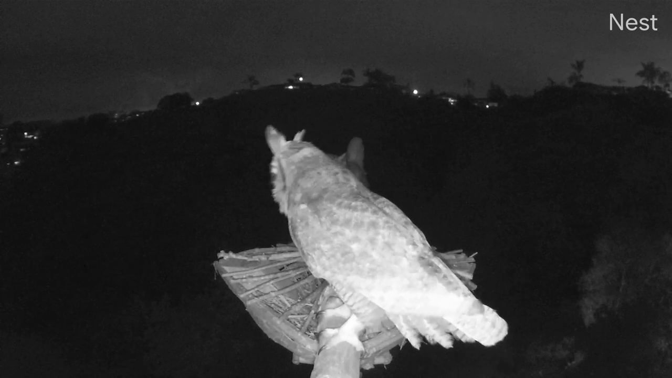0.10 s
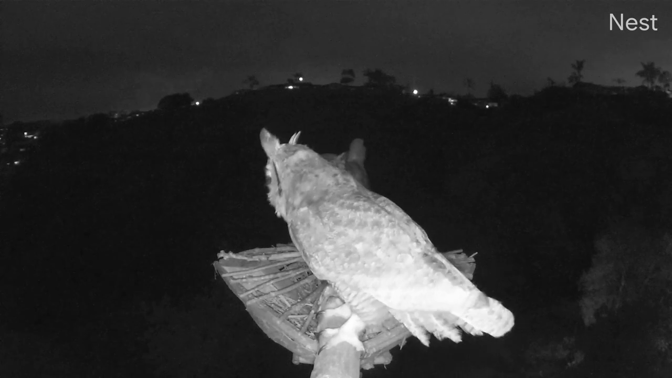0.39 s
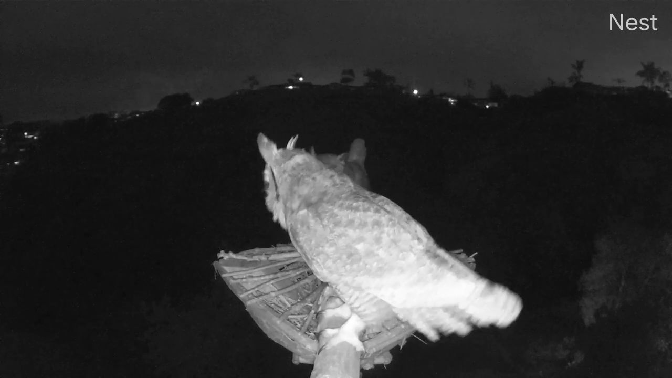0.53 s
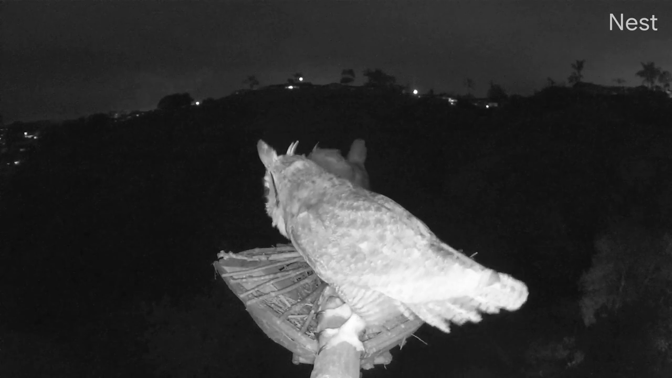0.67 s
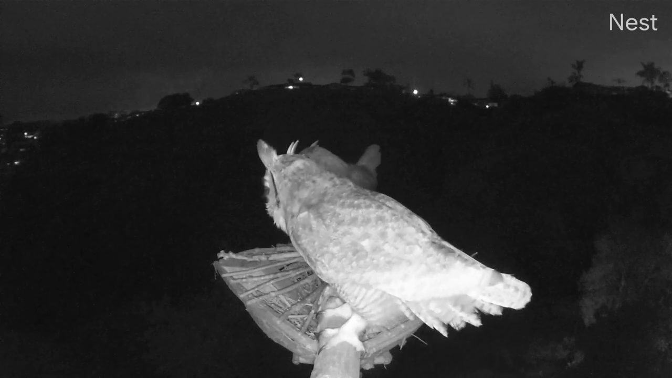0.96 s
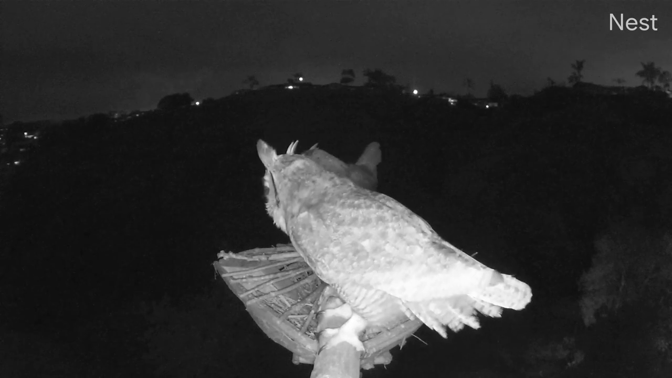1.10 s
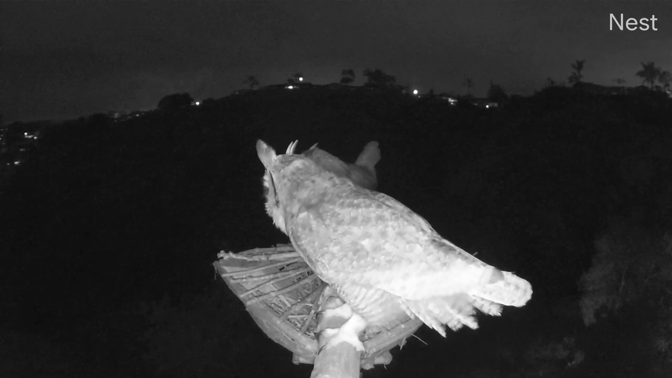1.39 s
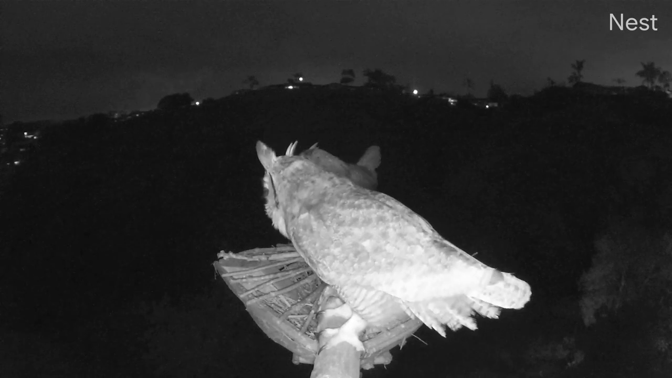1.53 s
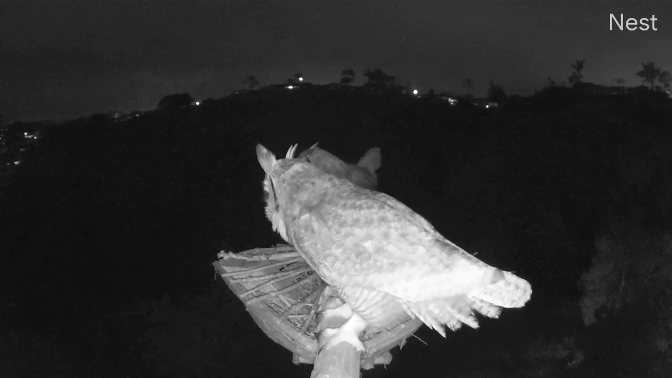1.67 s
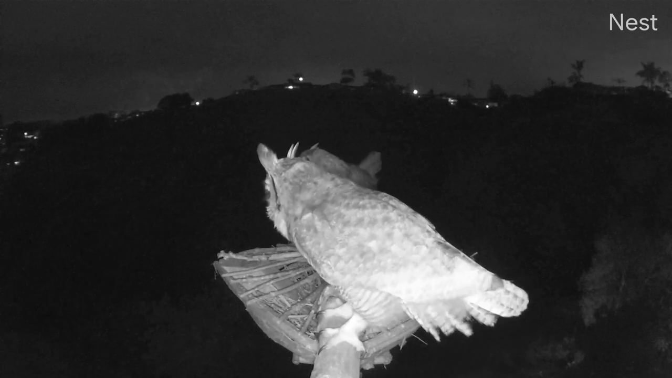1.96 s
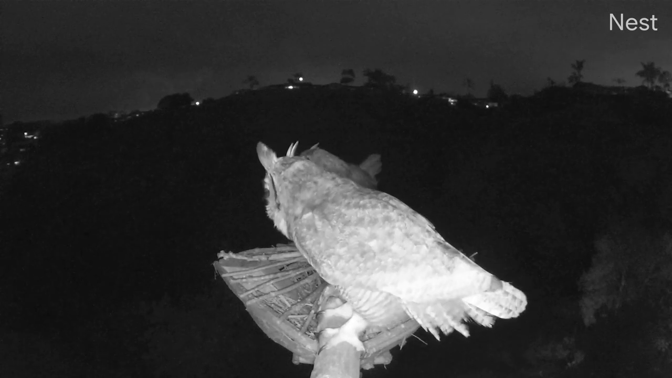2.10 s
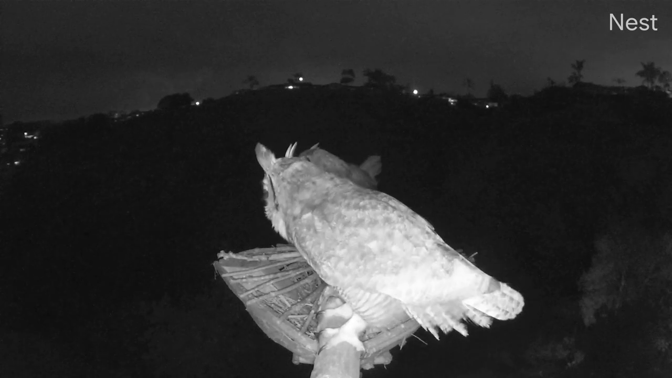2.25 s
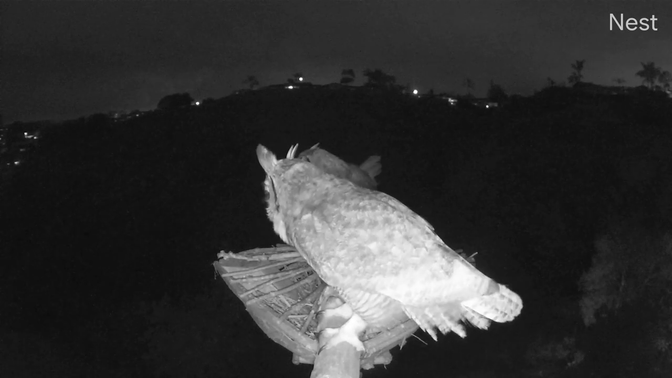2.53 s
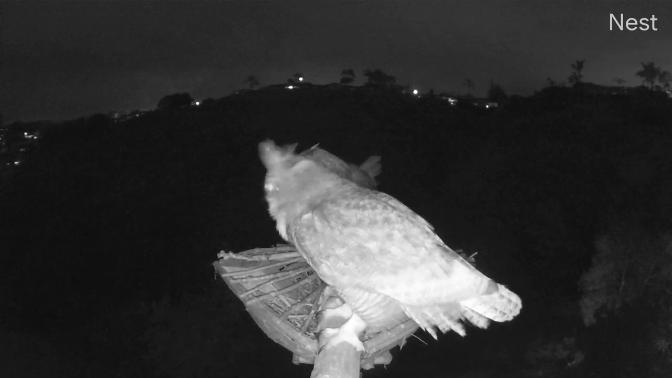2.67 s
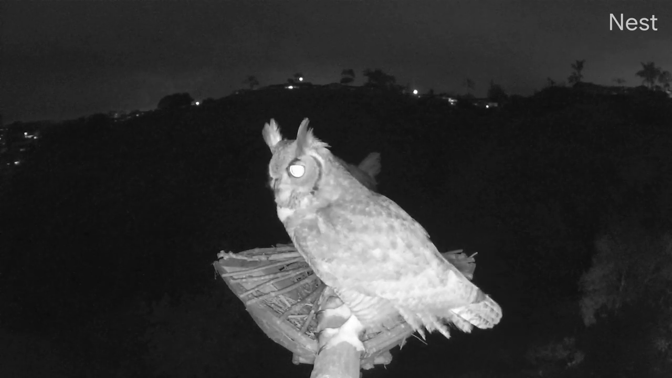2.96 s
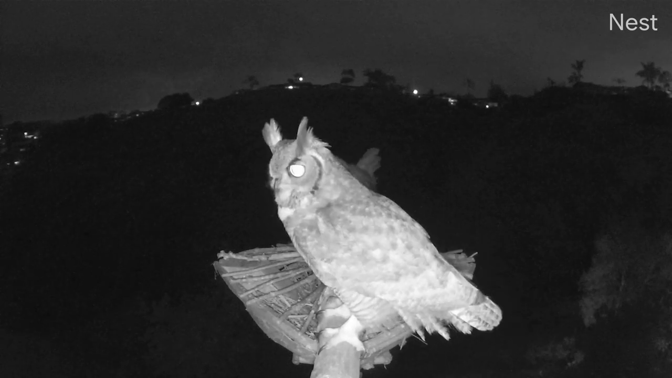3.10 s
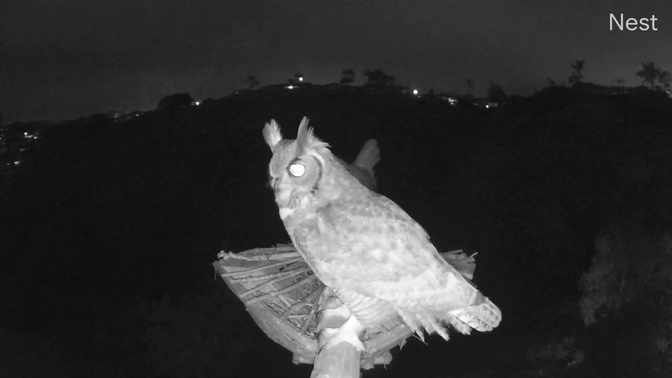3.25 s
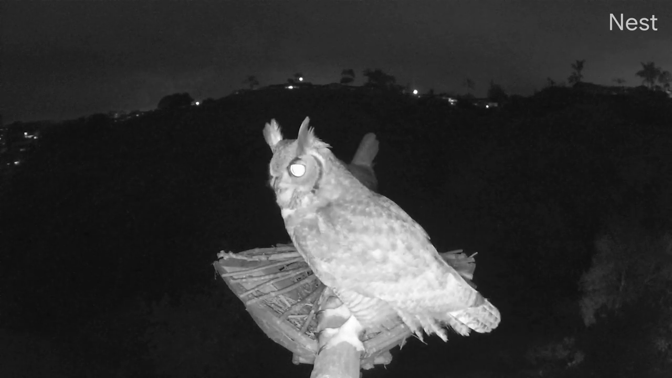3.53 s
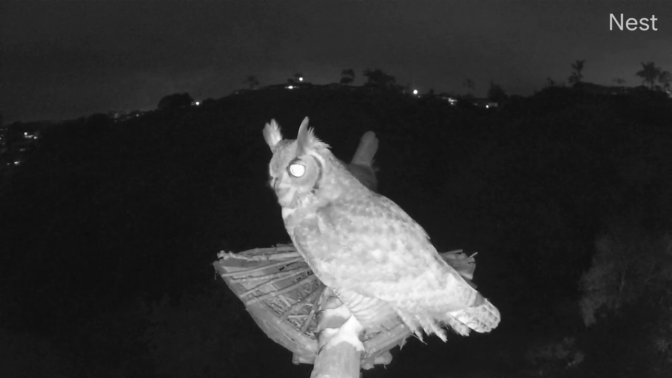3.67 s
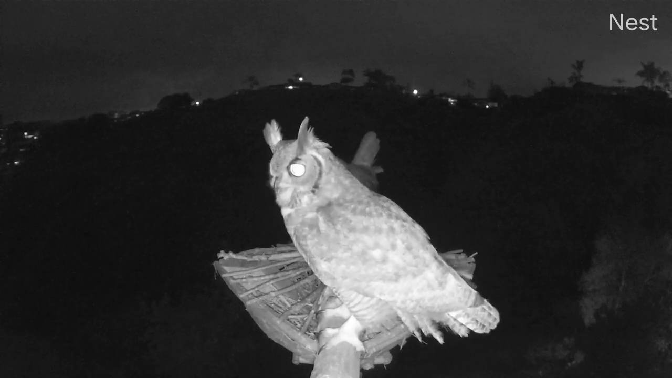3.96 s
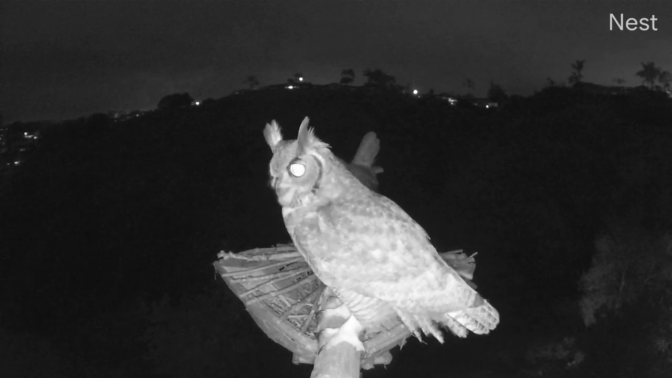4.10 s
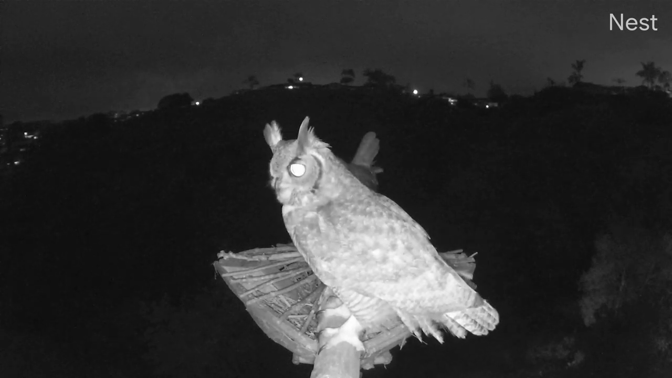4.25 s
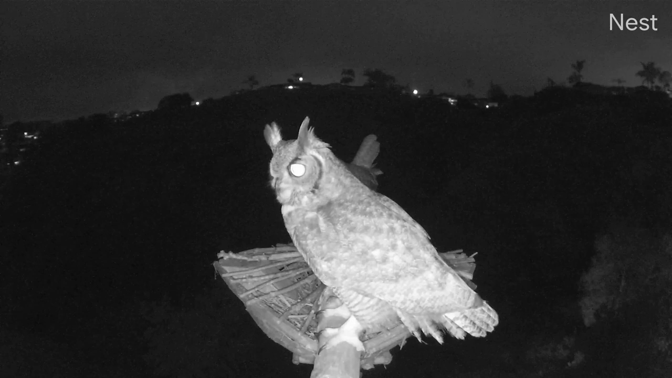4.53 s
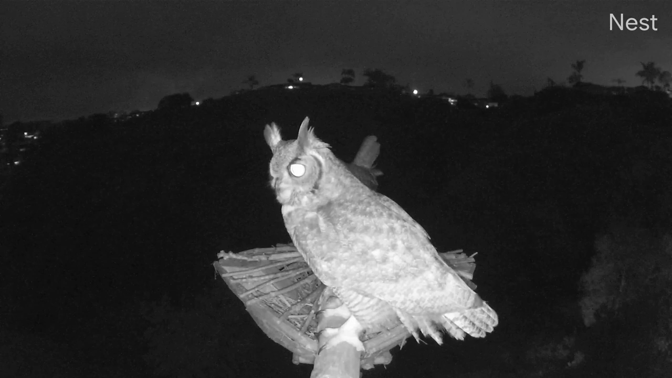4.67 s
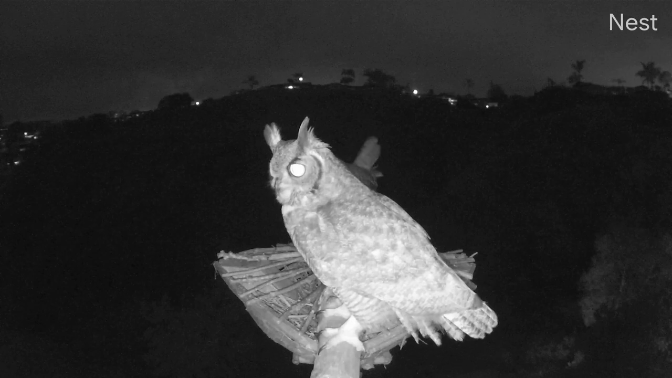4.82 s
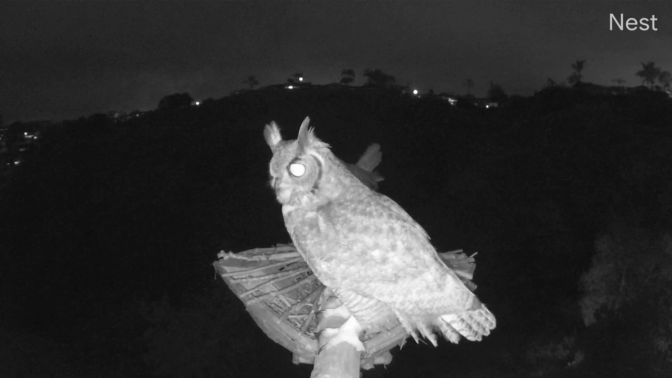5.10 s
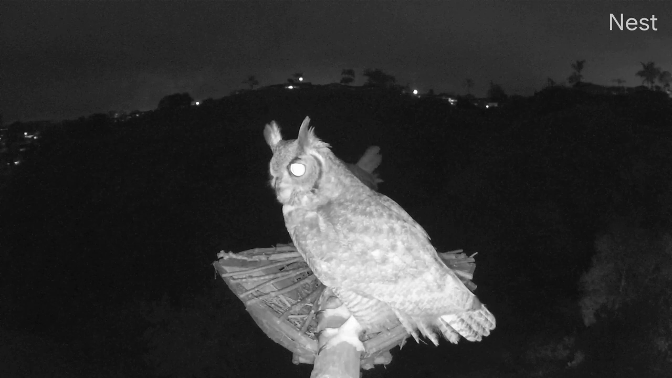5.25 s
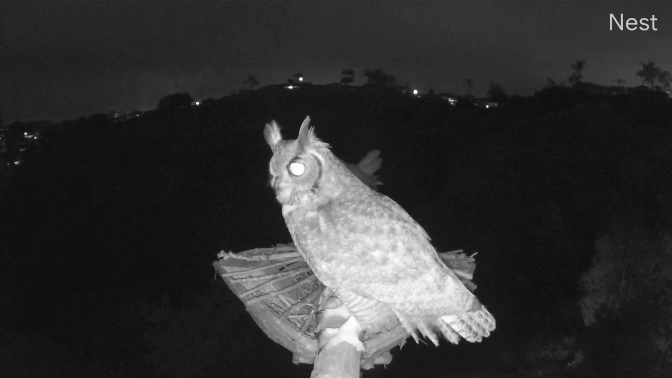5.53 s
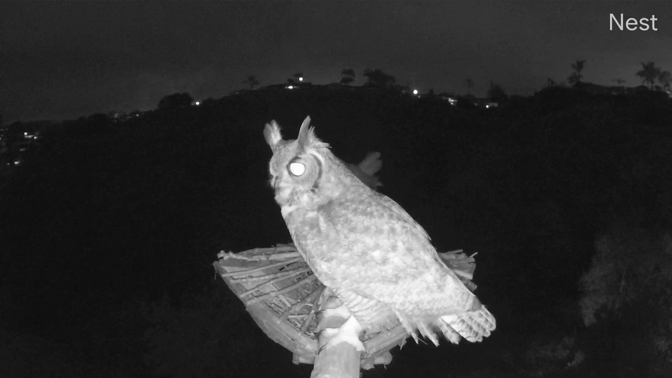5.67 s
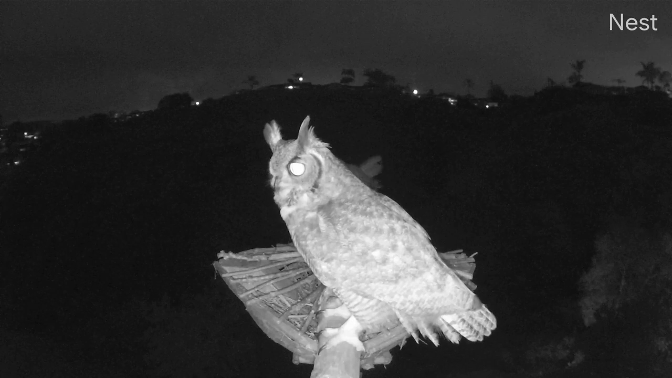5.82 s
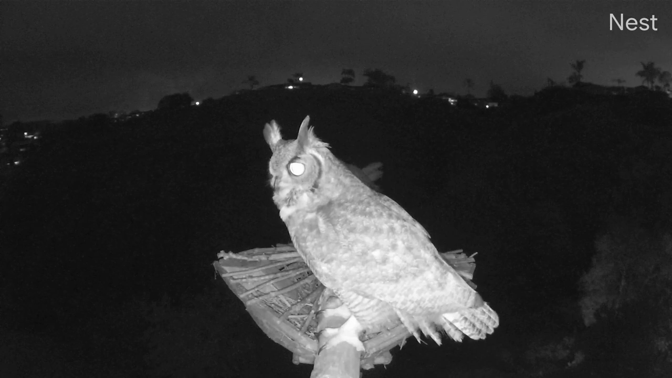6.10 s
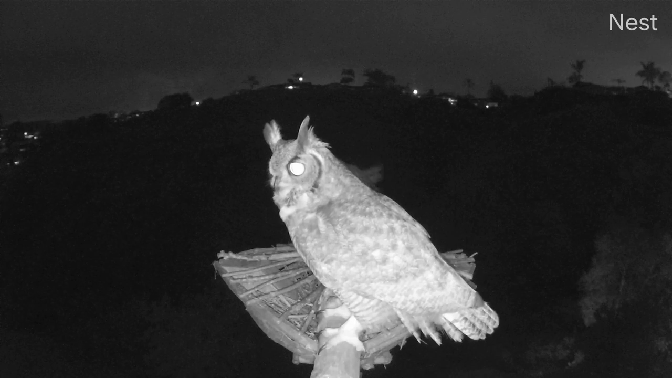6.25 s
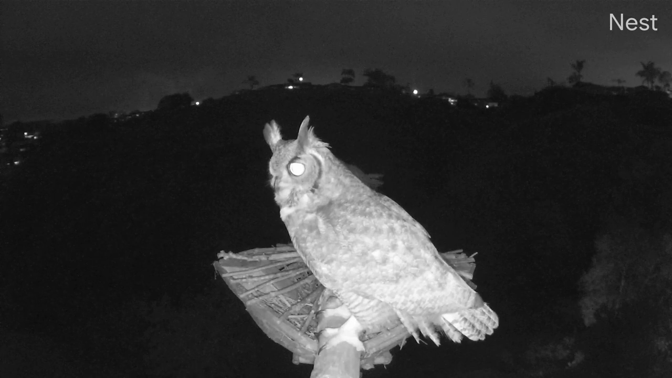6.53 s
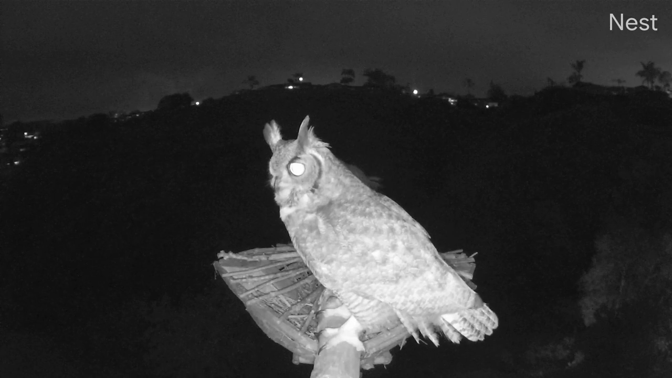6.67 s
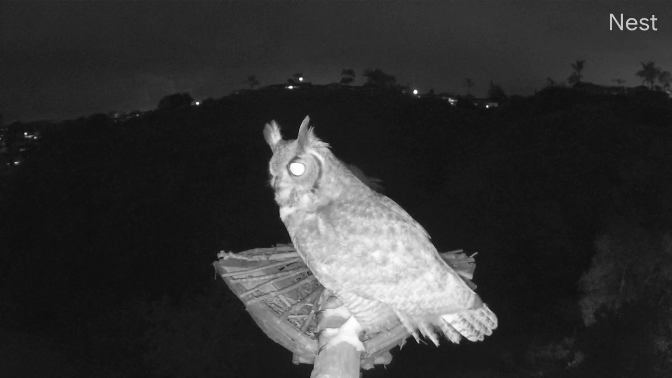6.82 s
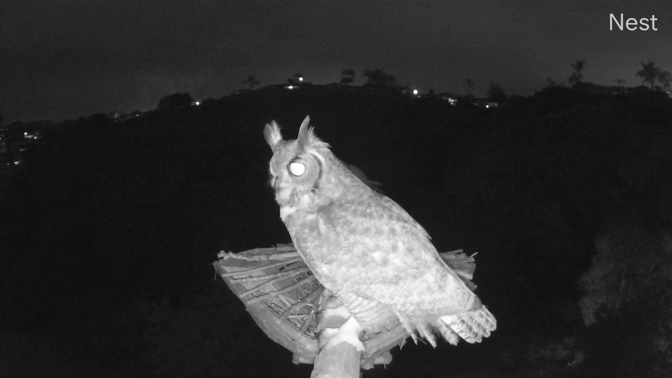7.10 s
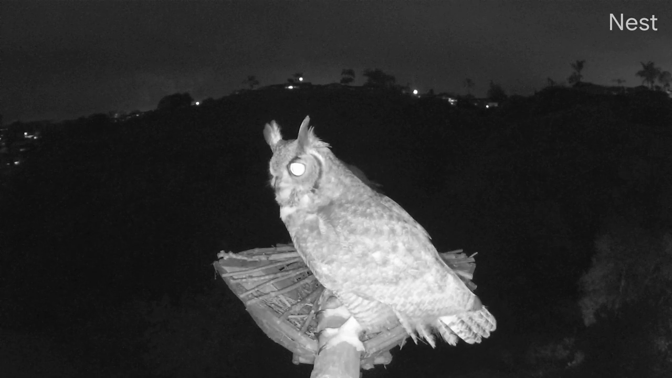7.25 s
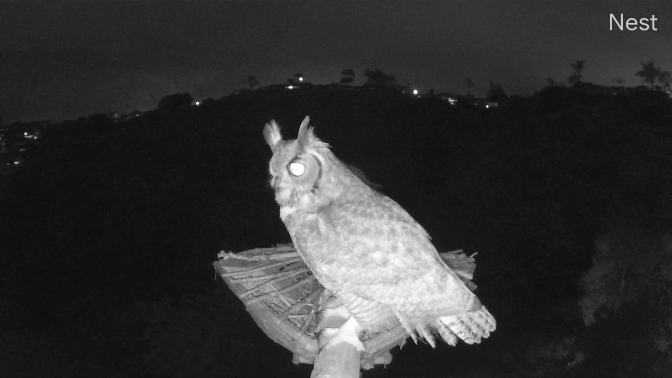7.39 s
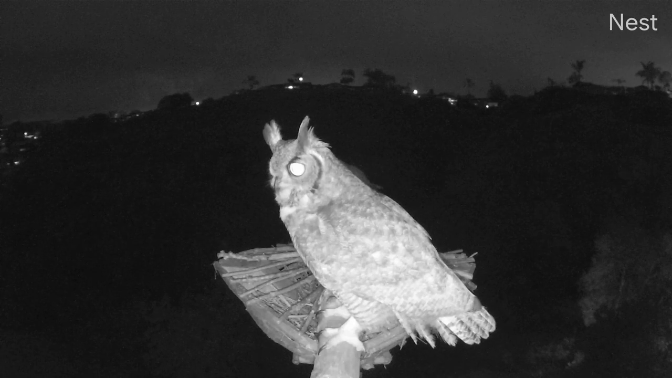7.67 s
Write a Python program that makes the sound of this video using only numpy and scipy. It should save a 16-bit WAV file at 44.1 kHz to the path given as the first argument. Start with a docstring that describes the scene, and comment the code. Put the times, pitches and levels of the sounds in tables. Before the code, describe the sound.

Two owls hoot outdoors at night. At first their low, soft, nearly pure hoots overlap, one voice a little higher and louder than the other. The lower owl ends the exchange, then the higher one gives a quick stuttering run and two slower, longer hoots. Faint distant traffic, tiny insect-like pips and the hiss of a small microphone continue behind and remain after the calls stop.

```python
"""A nest platform at night, where two great horned owls duet. The higher voice (probably the female)
sings two phrases; the lower one overlaps the first and ends it. Each hoot is an arch of pitch from
the syrinx, nearly a pure tone with its octave, echoed weakly by trees and slopes.
Far traffic, faint high pips and microphone hiss lie behind."""
import sys
import numpy as np
from scipy import signal
from scipy.fft import rfft, irfft
from scipy.io import wavfile
from scipy.ndimage import uniform_filter1d

SR = 44100
rng = np.random.default_rng(int(sys.argv[2]) if len(sys.argv) > 2 else 0)


def to_wav(sig):
    """Store sig (one row per channel, or 1-D mono) as 16-bit WAV at the path in sys.argv[1].

    Samples outside -1..1 are clipped; the rate is SR.
    """
    pcm = np.clip(np.atleast_2d(sig), -1, 1) * 32767
    pcm = np.round(pcm).astype(np.int16)
    wavfile.write(sys.argv[1], SR, pcm.T)  # frames by channels


N = 341775
TIME = np.arange(N) / SR


def gain_of(db):
    """Decibels to amplitude."""
    return 10 ** (np.asarray(db) / 20)


def unit_rms(x):
    """Scales to rms 1."""
    return x / np.sqrt(np.mean(x ** 2) + 1e-20)


def db_at(curve, hz):
    """Interpolates (f/Hz, level/dB) rows over log frequency."""
    curve_hz, curve_db = np.transpose(curve)
    return np.interp(np.log(hz + 1), np.log(curve_hz + 1), curve_db)


def waver(rate_hz):
    """Random drift of rms 1, low-passed at rate_hz."""
    hz = np.fft.rfftfreq(N, 1 / SR)
    white = rfft(rng.standard_normal(N))
    return unit_rms(irfft(white / np.sqrt(1 + (hz / rate_hz) ** 6), N))


def patchy_noise(spectrum, patchy_db):
    """Coloured noise of rms 1; its level drifts in patches of time and frequency."""
    frames, hz = N // 256 + 5, np.fft.rfftfreq(1024, 1 / SR)
    real, imag, patches = rng.standard_normal((frames, 513, 3)).T
    patches = uniform_filter1d(patches, size=5, axis=0)
    patches = unit_rms(uniform_filter1d(patches, size=14, axis=1))
    bins = (real + 1j * imag) * gain_of(db_at(spectrum, hz)[:, None] + patchy_db * patches)
    return unit_rms(signal.istft(bins, nperseg=1024, noverlap=768)[1][:N])


# Traffic spectrum: f/Hz, relative density/dB
TRAFFIC_SPECTRUM = [(60, -89), (100, -51), (135, -27), (220, -18), (350, -8), (600, -4.5), (900, -0.5),
                    (1350, 0), (1800, -6), (2400, -10.5), (3500, -29), (7000, -47)]
# Traffic swell: t/s, relative level/dB
TRAFFIC_SWELL = [(0.0, -57), (0.02, -54.5), (0.19, -53), (0.78, -55.5), (0.95, -53), (1.31, -55.5),
                 (1.36, -53.5), (2.09, -55.5), (2.11, -54), (3.21, -55), (3.73, -50), (4.32, -54),
                 (4.36, -50), (4.88, -54), (5.09, -50), (5.39, -54), (7.08, -52.5), (7.75, -54.5)]
# Traffic drones: f/Hz, relative level/dB
TRAFFIC_DRONES = [(357, -76), (416, -72)]


def traffic(wash_gain_db, drone_gain_db, pitch_drift):
    """Far traffic in the valley: a slowly swelling wash with two faint wavering drones."""
    swell_db = np.interp(TIME, *np.transpose(TRAFFIC_SWELL))
    sound = gain_of(swell_db + wash_gain_db) * patchy_noise(TRAFFIC_SPECTRUM, patchy_db=1.0)
    for hz, db in TRAFFIC_DRONES:
        cycles = np.cumsum(hz * (1 + pitch_drift * waver(5.1))) / SR
        sound += gain_of(db + drone_gain_db + 2 * waver(2.2)) * np.sin(2 * np.pi * cycles)
    return sound


def hoot(length_s, pitch_hz, level_db, rise_s, fall_s, crest, sag, fade_db):
    """One arch of tension sets pitch and level; both ease off away from the crest of the push."""
    onset_s, release_s = 0.0057, 0.012
    t = np.arange(0, length_s, 1 / SR)
    scoop = 1 - .60 * np.maximum(1 - t / rise_s, 0) ** 3.14
    drop = 1 - .64 * np.maximum(1 - (length_s - t) / fall_s, 0) ** 3.62
    off_crest = (t / length_s - crest) ** 2
    hz = pitch_hz * scoop * drop * (1 - sag * off_crest)
    arch_loss_db = 41 * (1 - scoop) + 39 * scoop * (1 - drop)  # level follows pitch
    gate = np.minimum(t / onset_s, 1) * np.minimum((length_s - t) / release_s, 1)
    return hz, gate * gain_of(level_db - fade_db * off_crest - arch_loss_db)


def song(hoots, sag, fade_db):
    """Pitch and envelope of one bird; overlapping hoots slur, the stronger push leading."""
    controls = np.zeros((2, N))
    for start_s, *shape in hoots:
        arch = np.array(hoot(*shape, sag, fade_db))
        span = round(start_s * SR) + np.arange(arch.shape[1])
        controls[:, span] = np.maximum(controls[:, span], arch)
    return controls


# Soft noise halo around a hoot: f/Hz, relative density/dB
HALO_SPECTRUM = [(30, -15.5), (120, -15.5), (165, -18), (205, -1.5), (320, -2.5), (420, -17.5),
                 (560, -10.5), (640, -13.5), (740, -3.5), (830, -20), (1300, -53.5)]


def syrinx(hz, envelope, throat, third_db, jitter_cycles, slack_cycles, shimmer_db):
    """Three harmonics in faint noise; the puffed throat favours the fundamental at higher pitch."""
    wobble, rasp, flutter, octave_flutter_db = waver(28), waver(90), waver(42), waver(58)
    halo = gain_of(-18) * patchy_noise(HALO_SPECTRUM, patchy_db=-1.0)
    cycles = np.cumsum(hz) / SR
    cycles -= np.maximum.accumulate(cycles * (hz == 0))  # each call starts from rest
    slack = np.clip((245 - hz) / 60, 0, 1)  # slack membranes cycle unevenly at low pitch
    phase = 2 * np.pi * (cycles + jitter_cycles * wobble + slack_cycles * slack * rasp)
    octave = gain_of(db_at(throat, hz) + octave_flutter_db)
    tone = (np.cos(phase) - octave * np.cos(2 * phase)) / np.sqrt(1 + octave ** 2)
    tone += gain_of(third_db) * np.cos(3 * phase)
    return envelope * gain_of(shimmer_db * flutter) * (np.sqrt(2) * tone + halo)


# Lower owl's hoots: t/s, length/s, nominal f/Hz, nominal level/dB, rise/s, fall/s, crest/length
LOW_HOOTS = [(0.056, 0.11, 285.5, -39.5, 0.04, 0.1, 0.56), (0.337, 0.317, 306, -33.5, 0.0605, 0.095, 0.281),
             (1.384, 0.404, 286.8, -34.2, 0.0823, 0.131, 0.27),
             (2.129, 0.33, 293.8, -33, 0.068, 0.14, 0.28)]
# Its throat response: f/Hz, octave re fundamental/dB
LOW_THROAT = [(200, 14), (235, 3.5), (265, -4.5), (295, -11)]


def low_owl():
    """The lower syrinx: four hoots that sag and fade more steeply."""
    hz, envelope = song(LOW_HOOTS, sag=.37, fade_db=32)
    return syrinx(hz, envelope, LOW_THROAT, third_db=-31,
                  jitter_cycles=.005, slack_cycles=.028, shimmer_db=1.07)


# Higher owl's hoots: t/s, length/s, nominal f/Hz, nominal level/dB, rise/s, fall/s, crest/length
HIGH_HOOTS = [(0.118, 0.424, 328, -31.0, 0.072, 0.109, 0.47),
              (0.835, 0.32, 335.7, -30.5, 0.052, 0.14, 0.32),
              (1.339, 0.219, 337.5, -30.5, 0.1, 0.159, 0.58), (2.833, 0.11, 251, -40, 0.063, 0.1, 0.51),
              (2.994, 0.141, 370.6, -27, 0.091, 0.168, 0.51), (3.28, 0.16, 363, -28.1, 0.071, 0.205, 0.32),
              (3.381, 0.18, 363.7, -26.5, 0.103, 0.146, 0.76),
              (3.438, 0.31, 340.9, -29.5, 0.113, 0.11, 0.28),
              (4.304, 0.41, 340.3, -29.5, 0.055, 0.121, 0.418),
              (4.996, 0.31, 340.8, -29.5, 0.054, 0.16, 0.28)]
# Its throat response: f/Hz, octave re fundamental/dB
HIGH_THROAT = [(200, 17), (245, 9), (280, -0.5), (310, -4), (345, -7.5)]


def high_owl():
    """The higher syrinx: two louder phrases, the second with a slurred run."""
    hz, envelope = song(HIGH_HOOTS, sag=.26, fade_db=19.5)
    return syrinx(hz, envelope, HIGH_THROAT, third_db=-26,
                  jitter_cycles=.007, slack_cycles=.04, shimmer_db=0.64)


def hillside_echo(sound, t60_s, wet_db):
    """Trees and slopes scatter a weak, sparse echo."""
    taps_per_s, predelay_s = 2000, .012
    t = np.arange(SR) / SR
    taps = rng.standard_normal(SR) * (rng.random(SR) < taps_per_s / SR)
    taps *= (t > predelay_s) * gain_of(-60 * t / t60_s)
    return gain_of(wet_db) * signal.fftconvolve(sound, taps / np.linalg.norm(taps))[:N]


# Clearer pips: t/s, relative level/dB
CLEAR_PIPS = [(2.4119, -51), (3.4421, -50.5), (3.9295, -51), (6.3091, -54), (6.5116, -51), (6.9122, -48.5),
              (7.0888, -47), (7.3153, -50), (7.4764, -48.5)]


def pips(faint_db, clear_gain_db, hz, waver_hz, per_s, length_s):
    """Irregular high pips, perhaps insects: brief swells of a wavering tone, a few clearer."""
    gap, size = rng.standard_normal((120, 2)).T
    times_s = np.cumsum(np.exp(.45 * gap)) / per_s
    gains = gain_of(faint_db + 4.2 * np.minimum(size, 1.5))
    pulses = np.bincount((times_s * SR).astype(int), gains, minlength=N)[:N]
    for time_s, db in CLEAR_PIPS:
        pulses[round(time_s * SR)] += gain_of(db + clear_gain_db)
    swells = signal.oaconvolve(pulses, signal.windows.hann(int(length_s * SR)), "same")
    phase = 2 * np.pi * np.cumsum(hz + waver_hz * waver(120)) / SR
    return swells * np.sqrt(2) * np.sin(phase)


def scene():
    """Both owls and their echo over traffic and pips; mono."""
    owls = high_owl() + low_owl()  # overlapping fundamentals beat
    night = traffic(wash_gain_db=1.0, drone_gain_db=0.5, pitch_drift=.006)
    night += pips(faint_db=-63.5, clear_gain_db=-6.5, hz=4770, waver_hz=90, per_s=11, length_s=0.024)
    return (owls + hillside_echo(owls, t60_s=0.45, wet_db=-24) + night)[None]


# Microphone hiss: f/Hz, relative density/dB
HISS_SPECTRUM = [(70, -53.5), (300, -22.5), (1500, -3), (2300, -2), (3700, -1), (4200, 0.5), (4450, -0.5),
                 (4780, 5.5), (5080, -1.5), (5500, 3), (5900, -3), (6750, -2.5), (6900, -19.5), (7400, -20)]


def record(dry):
    """A small microphone adds hiss; a steep low-pass limits the band."""
    cutoff_hz = 7500
    hiss = gain_of(-57) * patchy_noise(HISS_SPECTRUM, patchy_db=3.0)
    low_pass = signal.firwin(511, cutoff_hz, window=("kaiser", 9), fs=SR)
    return signal.oaconvolve(dry + hiss, low_pass[None], "same")


dry = scene()
out = record(dry)
to_wav(out)
```